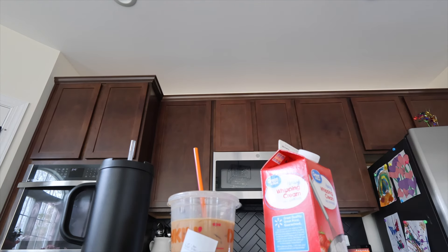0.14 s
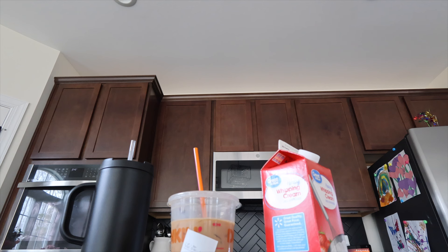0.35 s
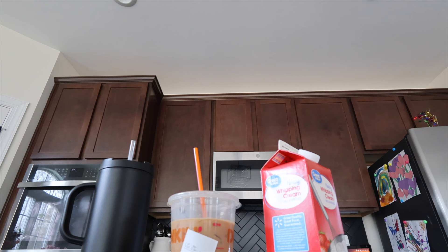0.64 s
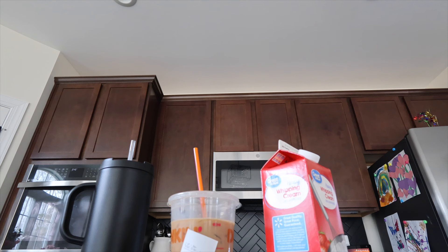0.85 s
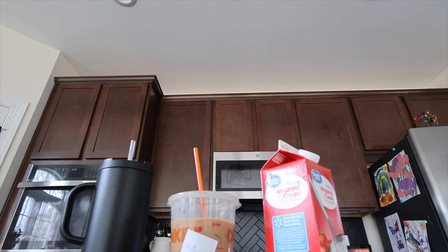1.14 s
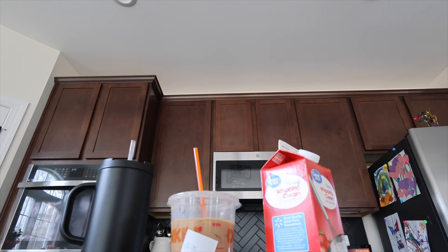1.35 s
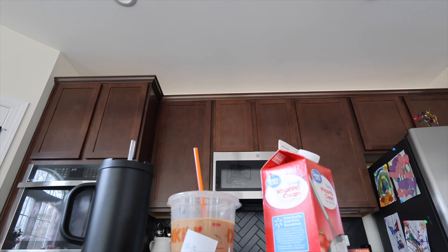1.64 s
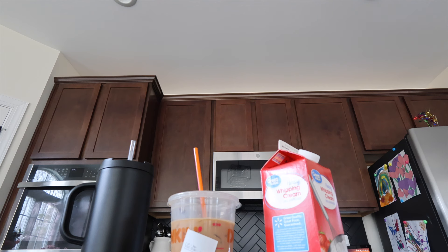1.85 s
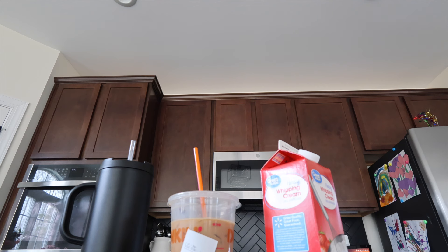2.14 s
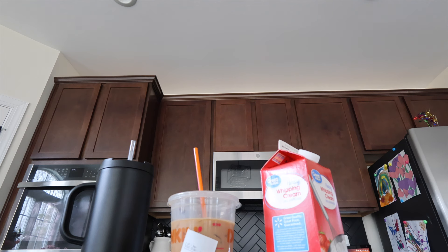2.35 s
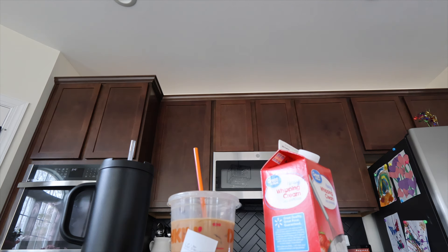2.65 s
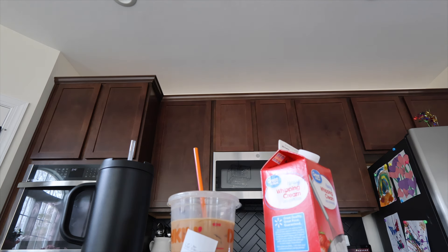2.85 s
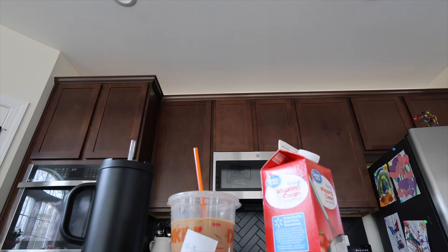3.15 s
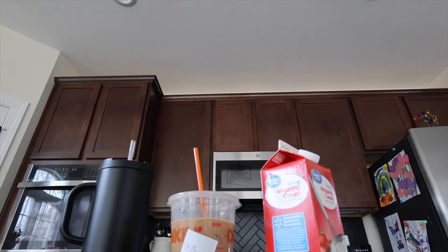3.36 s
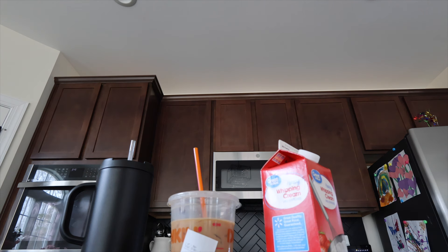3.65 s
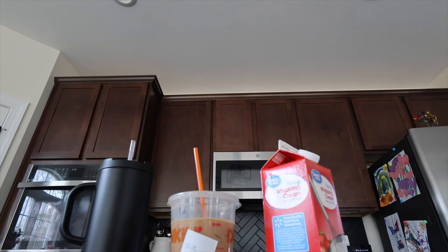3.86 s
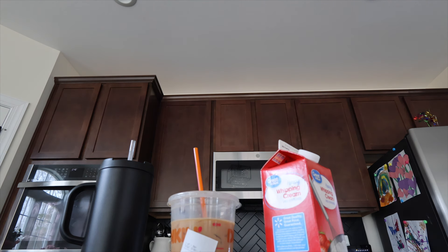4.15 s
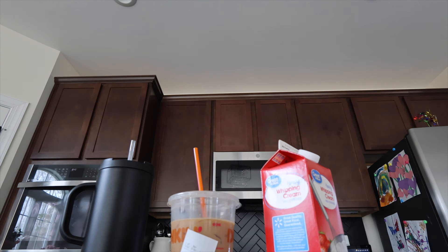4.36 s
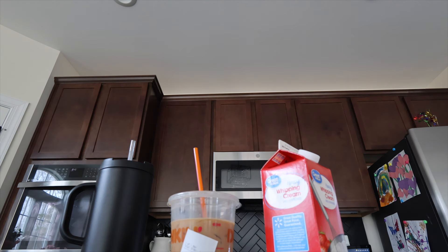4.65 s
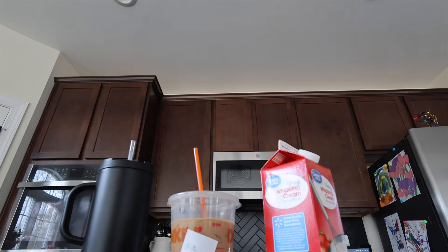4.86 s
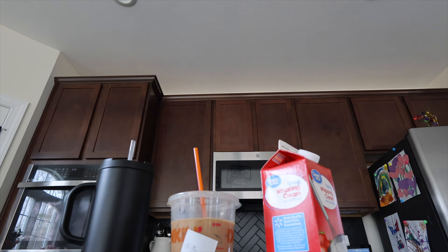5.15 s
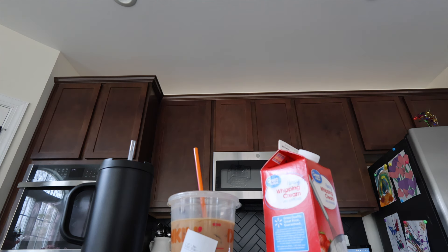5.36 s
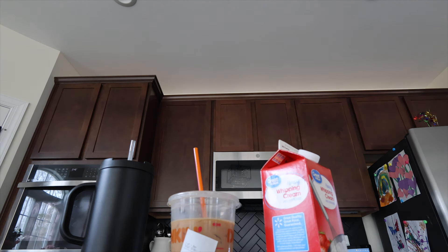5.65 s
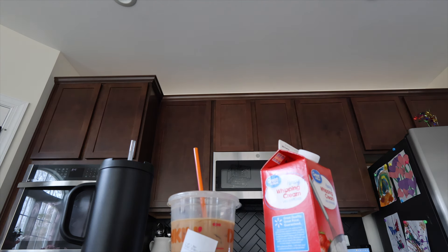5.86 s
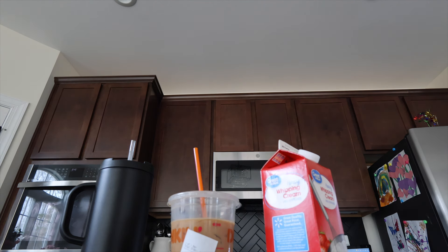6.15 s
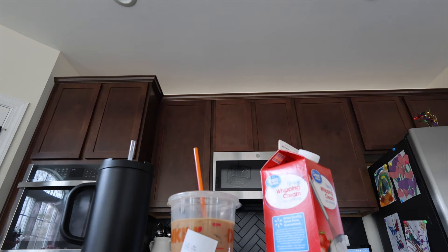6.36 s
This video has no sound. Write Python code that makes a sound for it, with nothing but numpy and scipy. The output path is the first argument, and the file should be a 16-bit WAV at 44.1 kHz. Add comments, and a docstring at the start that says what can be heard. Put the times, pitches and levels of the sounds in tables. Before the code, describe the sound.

Quiet kitchen with a humming, gurgling appliance and soft footsteps; one sudden loud wooden cupboard slam rings briefly, then small clicks and scuffs.

```python
"""First heard is an appliance humming and throbbing in a hard-walled kitchen, while slippers scuff and slide.
Across the kitchen a wooden cupboard door touches its frame, then bangs shut; panel modes and the room ring on.
Steps are noise in the bands of the sole, clicks are pairs of short rings, and the appliance is noise in the
resonances of its casing. Two close microphones: bass alike on both sides, treble largely unrelated."""
import sys
import numpy as np
from scipy import signal
from scipy.fft import rfft, irfft, next_fast_len
from scipy.io import wavfile
from scipy.ndimage import map_coordinates

SR = 44100
rng = np.random.default_rng(int(sys.argv[2]) if len(sys.argv) > 2 else 0)


def store_wav(level_fs):
    """Save 16-bit WAV to argv[1]."""
    pcm = np.round(np.clip(np.atleast_2d(level_fs), -1, 1) * 32767)
    wavfile.write(sys.argv[1], SR, pcm.T.astype(np.int16))


def magnitude_from_level(level_db):
    """Linear magnitude for a level in decibels (20 dB per decade)."""
    exponent = np.asarray(level_db, float) / 20
    return 10 ** exponent


N = 286763  # length in samples
HZ, FRAMES = signal.stft(np.zeros(N), SR, nperseg=128)[:2]  # band centres (Hz) and frame times (s)

# Door contacts: start_s, relative room_db, relative panel_ring_db, rattle_s (decay time),
# brightness_db_per_octave (reached well above 1 kHz)
DOOR_CONTACTS = [(2.403, -30, -42.5, 0.016, -4), (2.459, -26, -10.5, 0.005, 2.95),
                 (2.464, -13, -11, 0.0026, 0.67), (2.471, -10.5, -6, 0.0031, -1),
                 (2.476, -15, -16.5, 0.0048, -1.14), (2.488, -21, -13, 0.0048, -6)]
# Modes of door and carcass: pitch_hz, relative level_db, t60_s (capped in door())
PANEL_MODES = [(125, -13.5, 0.6), (154.5, -23, .45), (190.1, -14, 0.53), (239.2, -17.5, .5),
               (269, -4.5, .45), (292, -9.5, 0.71), (343, -10, 0.28), (388.8, -0.5, 0.36),
               (411.5, -4.5, 0.24), (444, -6, .3), (460.5, -0.5, .42), (470, -7.5, 0.2), (486, -8, 0.61),
               (609, -15, 0.55), (677, -9, 0.42), (734, -6.5, .45), (809.7, -15.5, .45), (945, -11.5, 0.52),
               (1120, -11, 0.65), (1275, -10, .5), (1614, -11.5, 0.4), (1848, -7.5, 0.34), (1944, -8.5, .4),
               (2180, -10.5, 0.31), (2490, -16.5, 0.4), (3120, -11.5, 0.22), (3260, -14, 0.51),
               (3570, -14.5, .35)]
# Colour of the bang in the room: frequency_hz, relative level_db (per Hz)
BANG_COLOUR = [(40, -59.5), (70, -39.5), (120, -16.5), (250, -16.5), (450, -9.5), (620, -11.5), (900, -11),
               (1400, -15), (2000, -13), (3100, -12.5), (4500, -14.5), (7000, -25), (10000, -33),
               (13000, -41.5), (15500, -45.5)]
# Likeness of the bang at the two microphones: frequency_hz, likeness (-1 to 1, no unit)
BANG_LIKENESS = [(60, 1), (300, 1), (640, 0.9), (1400, 0.93), (2400, 0.76), (3300, 0.5), (3900, -0.46),
                 (5200, -0.49), (6500, 0.046), (8000, -0.054), (10000, 0.36), (15000, 0.37)]
# Lean of the bang to one side: frequency_hz, left_minus_right_db
BANG_BALANCE = [(200, -0.95), (550, 0.2), (1650, 0.4), (3000, -0.5), (5000, 2), (8000, 0), (14000, -1)]
# Soles on the floor: start_s, relative hiss_db, grit_db and scrape_db (both relative to hiss), rise_s
SCUFF_EVENTS = [(0.06, -71.5, 14, 14, 0.003), (.268, -70, -5, 10, 0.039), (.61, -60, 6, 9, 0.025),
                (.645, -42.5, -6, -3.5, 0.0019), (.786, -67.5, 12.5, 6, 0.1), (.923, -58.5, 7, 3, 0.029),
                (1.182, -57, -0.5, -2, 0.01), (1.466, -78.5, 15.5, 19, 0.02),
                (1.914, -63.5, -7, -14, 0.0055), (2.275, -66.5, 4.5, 8, 0.0038), (3.651, -55, -2, -2, .022),
                (3.82, -63, -5, -12, 0.0048), (4.022, -45, -3.5, -18, 0.028), (4.036, -53, 3, 3, 0.0025),
                (4.165, -62, 4, -16, .028), (4.305, -68, 15.5, 17, .005), (4.39, -56, 1.5, -26, 0.036),
                (4.87, -67.5, 6.5, 0, 0.026), (4.909, -42.5, -2, -2.5, 0.0025),
                (5.684, -72.5, 4.5, 20.5, 0.0024), (5.732, -71.5, 15, -5, 0.0034),
                (6.426, -55, -3, -8, .008)]
# Heels landing: start_s, level_db
HEEL_SLAPS = [(.648, -46), (4.043, -44)]
# Sole bands, rows hiss, grit, scrape: centre_hz, width_hz (of the resonance before its power is narrowed)
SOLE_BANDS = [(8740, 4800), (3420, 3280), (1700, 2400)]
# Likeness of steps and clicks at the two microphones: frequency_hz, likeness (-1 to 1, no unit)
STEP_LIKENESS = [(400, 0.85), (1000, 0.73), (2400, 0.76), (3800, 0.326), (5500, -0.19), (7500, -.25),
                 (10000, -0.11), (15000, -0.066)]
# Small hard clicks: start_s, relative level_db, pitch_hz, second_pitch_hz, second_db (relative to the first)
CLICK_EVENTS = [(1.354, -55.5, 2610, 3220, -4), (2.967, -53, 1670, 1106, 0.5),
                (2.976, -51.5, 1570, 2730, 2), (2.979, -63.5, 7370, 5500, -14),
                (2.989, -58.5, 1370, 2930, 4), (3.096, -53.5, 3420, 4180, -4),
                (3.108, -64, 3520, 4040, -2.5), (3.14, -67, 3300, 4270, -5), (3.285, -59, 2520, 3320, 0.5),
                (3.52, -55, 2330, 2920, -0.5), (3.819, -57.5, 2340, 3330, -14),
                (3.869, -56.5, 2580, 2980, -6), (5.686, -55, 1070, 1700, -14.5)]
# Weight shifting on the floor: start_s, level_db, rise_s, fade_s (decay time)
FLOOR_THUDS = [(4.1, -51.5, 0.3, .05), (4.9, -56.5, 0.088, 0.036), (5.18, -58.5, .03, .05)]
# Casing resonances, each used squared: centre_hz, width_hz (before squaring), relative level_db
DRONE_MODES = [(178, 34, -10.5), (215.8, 13.7, -5), (291.7, 16.8, 1), (330.4, 23, -5), (364.3, 6.55, -5.5),
               (431.7, 16.8, -14)]
THROB_MODES = [(677, 82, -6.5), (737, 33, -9), (790, 45, -3)]
HISS_MODES = [(2290, 74, -1.5), (3294, 530, 0.5), (3700, 300, 1), (4507, 200, -6)]
# Surges of water in the appliance: start_s, length_s, level_db (at the start)
WATER_SURGES = [(0.181, 0.39, -55.5), (0.637, 0.19, -58), (1.005, 0.13, -56.5), (1.257, 0.58, -55.5),
                (1.928, 0.1, -65), (2.053, 0.075, -61), (2.187, 0.27, -61.5), (2.804, 0.39, -58.5),
                (3.324, 0.33, -60.5), (3.71, 0.064, -59.5), (3.873, 0.066, -61.5), (3.997, 0.52, -56.5),
                (4.62, 0.076, -61), (4.756, 0.085, -62), (4.903, .07, -65), (4.997, 0.059, -63),
                (5.155, 0.57, -57.5), (5.775, 0.11, -67), (5.984, 0.27, -61), (6.34, 0.047, -64.5),
                (6.443, .04, -65.5)]
# Swells of appliance hiss: start_s, level_db, rise_s, fade_s (decay time)
HISS_RISES = [(1.33, -66.5, .07, .6), (3.1, -67, 0.63, 0.51)]
# Colour of the steady room air: frequency_hz, relative level_db (per Hz)
AIR_COLOUR = [(30, -45.5), (50, -23), (60, 5.5), (73, -7.5), (86, 1.5), (105, -8.5), (140, -4.5), (300, -2),
              (520, -9), (700, -12.5), (850, -18), (1000, -18.5), (2000, -23.5), (4500, -30.5),
              (7600, -31.5), (11000, -36), (15500, -42.5)]
# Likeness of appliance and air at the two microphones: frequency_hz, likeness (-1 to 1, no unit)
AIR_LIKENESS = [(60, 1), (300, 1), (640, 0.96), (1400, .7), (3000, 0.55), (4600, -0.13), (6800, -0.01),
                (10000, -0.16), (15000, -0.22)]
# Decay of the kitchen: frequency_hz, t60_s
KITCHEN_DECAY = [(100, 0.44), (300, 0.66), (1000, 0.53), (3000, 0.5), (7000, 0.45), (12000, .26)]


def door():
    """Each contact rattles briefly, fills the room and sets the panel modes ringing as decaying sines."""
    longest_t60_s, ring_rise_s = 0.46, 0.0077
    rings, power = np.zeros((2, N)), 0
    t = np.arange(30000) / SR

    def shift(hz):
        """Phase in radians by which a mode is out of step at the left and right microphones."""
        return np.arccos(np.clip(along(BANG_LIKENESS, hz), -1, 1)) * np.array([[-0.3], [0.3]])

    for s, room_db, ring_db, rattle_s, bright_db in DOOR_CONTACTS:
        colour = magnitude_from_level(room_db + bright_db * np.log2(HZ / 1000 + 1)) ** 2
        rise_s = 0.002 + 0.3 * rattle_s  # a longer rattle builds up more slowly
        power = power + np.outer(colour, stroke(s, rise_s, rattle_s))
        ring = 0
        for hz, level_db, t60_s in PANEL_MODES:
            decay = magnitude_from_level(level_db - 60 * t / min(t60_s, longest_t60_s))
            ring = ring + decay * np.sin(2 * np.pi * hz * t + shift(hz))
        add(rings, s, magnitude_from_level(ring_db - 10.5) * ring * (1 - np.exp(-t / ring_rise_s)))
    wash = room(power, BANG_LIKENESS, direct_db=-0.5)
    wash = filtered(wash, lambda hz: magnitude_from_level(along(BANG_COLOUR, hz) + 25.0))
    sides = np.array([[0.5], [-0.5]])
    return filtered(wash + rings, lambda hz: magnitude_from_level(along(BANG_BALANCE, hz) * sides))


def thump():
    """Air squeezed out of the cupboard as the door closes: one soft low push, a decaying sine."""
    start_s, level_db, pitch_hz, rise_s, t60_s = 2.468, -21.5, 108.6, 0.015, 0.13
    t = np.maximum(np.arange(N) / SR - start_s, 0)
    envelope = magnitude_from_level(level_db - 60 * t / t60_s) * (1 - np.exp(-t / rise_s))
    return envelope * np.sin(2 * np.pi * pitch_hz * t)


def scuffs():
    """Friction noise through three broad bands of the sole, heard mostly through the room."""
    bands = []
    for centre_hz, width_hz in SOLE_BANDS:
        treble_cut = 1 + (HZ / 12500) ** 8
        bass_cut = 1 + (1100 / (HZ + 1)) ** 4
        bands.append(abs(peak(HZ, centre_hz, width_hz)) ** 3 / treble_cut / bass_cut)
    hiss, grit, scrape = bands
    power = 0
    for s, hiss_db, grit_db, scrape_db, rise_s in SCUFF_EVENTS:
        colour = hiss + magnitude_from_level(grit_db) ** 2 * grit + magnitude_from_level(scrape_db) ** 2 * scrape
        slacken_s = 0.014 + 0.5 * rise_s  # a slower slide also dies away more slowly
        power = power + np.outer(magnitude_from_level(hiss_db) ** 2 * colour, stroke(s, rise_s, slacken_s))
    grains = magnitude_from_level(4 * rng.standard_normal(len(FRAMES)))  # the sole catches unevenly
    return magnitude_from_level(9.0) * room(power * grains, STEP_LIKENESS, direct_db=-3.5)


def slaps():
    """A heel lands: a short dry crack of broad-band noise, heard directly."""
    centre_hz, width_hz, t60_s, rise_s = 3000, 5000, 0.03, 0.001
    t = np.arange(N) / SR
    gain = 0
    for s, level_db in HEEL_SLAPS:
        decay = magnitude_from_level(level_db - 60 * np.abs(t - s) / t60_s)
        gain = gain + decay * np.clip((t - s) / rise_s, 0, 1)
    crack = filtered(rng.standard_normal((2, N)), lambda hz: peak(hz, centre_hz, width_hz))
    return gain * unit(stereo(crack, STEP_LIKENESS))


def clicks():
    """Two short rings a click, then the room's answer in the same colour."""
    width_hz, direct_gain_db, room_gain_db = 270, 4, 19.0
    out, power = np.zeros((2, N)), 0
    t = np.arange(1500) / SR
    envelope = np.exp(-0.9 * width_hz * t) * (1 - np.exp(-t / 0.001))
    for s, level_db, hz, second_hz, second_db in CLICK_EVENTS:
        ring = np.sin(2 * np.pi * hz * t) + magnitude_from_level(second_db) * np.sin(2 * np.pi * second_hz * t)
        add(out, s, magnitude_from_level(level_db + direct_gain_db) * (ring * envelope)[None])
        first = abs(peak(HZ, hz, width_hz)) ** 2
        second = abs(magnitude_from_level(second_db) * peak(HZ, second_hz, width_hz)) ** 2
        colour = (first + second) ** 1.4
        power = power + np.outer(magnitude_from_level(level_db) ** 2 * colour, stroke(s, 0.001765, 0.0091))
    return out + magnitude_from_level(room_gain_db) * room(power, STEP_LIKENESS, direct_db=-1)


def thuds():
    """The floor rumbles under shifting weight: resonant low noise, alike at both microphones."""
    rumble = filtered(rng.standard_normal(N), lambda hz: peak(hz, 80, 122))
    return np.sqrt(strokes(FLOOR_THUDS)) * unit(rumble)


def appliance():
    """Motor and water noise in the casing's resonances: a wavering, sinking drone, hiss and a surging throb."""
    drone_db, drone_sag_db_per_s, drone_waver_db = -54, 0.38, 1.5
    hiss_db, throb_waver_db = -70, 1.5
    t = np.arange(N) / SR
    drone_gain = magnitude_from_level(drone_db - drone_sag_db_per_s * t + drone_waver_db * waver(t))
    drone = drone_gain * noise(casing(DRONE_MODES))
    hiss = np.sqrt(magnitude_from_level(hiss_db) ** 2 + strokes(HISS_RISES)) * noise(casing(HISS_MODES))
    throb = 0
    for centre_hz, width_hz, level_db in THROB_MODES:
        # each resonance of the middle band wavers by itself
        gain = magnitude_from_level(throb_waver_db * waver(t) + level_db) * np.sqrt(width_hz)
        throb = throb + gain * noise(casing([(centre_hz, width_hz, level_db)]))
    return drone + hiss + surges(t) * unit(throb)


def casing(modes):
    """Response of the casing: the powers of its squared resonances add up."""
    return lambda hz: np.sqrt(sum(abs(magnitude_from_level(db) * peak(hz, c, w) ** 2) ** 2 for c, w, db in modes))


def waver(t):
    """Smooth random wandering through 4.5 random values a second."""
    return map_coordinates(rng.standard_normal(100), [t * 4.5])


def surges(t):
    """Gain of the water: each surge sets in quickly, sags for up to a second and drains away."""
    rise_s, fall_s, sag_db_per_s = 0.015, 0.062, 8.5
    gain = 0
    for s, length_s, level_db in WATER_SURGES:
        onset = np.clip((t - s) / rise_s, 0, 1)
        release = np.clip(1 - (t - s - length_s) / fall_s, 0, 1)
        gain = gain + onset * release * magnitude_from_level(level_db - sag_db_per_s * np.clip(t - s, 0, 1))
    return gain


def air():
    """Steady room tone of coloured noise, with a thin fuzzy line high up."""
    line = magnitude_from_level(-85.0) * noise(lambda hz: peak(hz, 7600, 60))
    return magnitude_from_level(-56) * noise(lambda hz: magnitude_from_level(along(AIR_COLOUR, hz))) + line


def room(power, alike, direct_db):
    """Source power (band x time) is heard directly and fills a store of room energy draining band by band."""
    keep = magnitude_from_level(-60 * FRAMES[1] / along(KITCHEN_DECAY, HZ)) ** 2  # energy left after one frame
    stored = np.array([signal.lfilter([1 - k], [1, -k], band) for k, band in zip(keep, power)])
    grain = signal.stft(rng.standard_normal((2, N)), nperseg=128)[2]
    z = grain * np.sqrt(stored + magnitude_from_level(direct_db) ** 2 * power)
    return stereo(signal.istft(z, nperseg=128)[1][:, :N], alike)


def stroke(s, rise_s, hold_s):
    """Power of one contact over time: it swells, then slackens."""
    t = FRAMES - s
    swell = np.clip(t / abs(rise_s), 0, 1) ** 2
    return swell * np.exp(-2 * np.maximum(t - abs(rise_s), 0) / abs(hold_s))


def strokes(rows):
    """Summed power of (start_s, level_db, rise_s, fade_s) rows, one value per sample."""
    power = sum(magnitude_from_level(db) ** 2 * stroke(s, rise_s, fade_s) for s, db, rise_s, fade_s in rows)
    return np.interp(np.arange(N) / SR, FRAMES, power)


def noise(response):
    """Stereo noise of rms 1 with a given colour."""
    return unit(stereo(filtered(rng.standard_normal((2, N)), response), AIR_LIKENESS))


def stereo(pair, alike):
    """Two unrelated signals mixed to a left-right likeness."""
    def mix(hz):
        turn = np.arccos(np.clip(along(alike, hz), -1, 1)) / 2
        return np.array([np.cos(turn), np.sin(turn)])

    mid, side = filtered(pair, mix)
    return np.array([mid + side, mid - side])


def peak(hz, centre_hz, width_hz):
    """One causal resonance."""
    return 1j * hz * width_hz / (centre_hz ** 2 - hz ** 2 + 1j * hz * width_hz)


def filtered(x, response):
    """x times a response of frequency."""
    m = next_fast_len(x.shape[-1] + 4096)
    return irfft(rfft(x, m) * response(np.fft.rfftfreq(m, 1 / SR)), m)[..., :x.shape[-1]]


def along(points, hz):
    """(frequency_hz, value) points read on a log axis."""
    f, v = np.transpose(points)
    return np.interp(np.log(hz + 1), np.log(f + 1), v)


def unit(x):
    """Scaled to rms 1."""
    return x / np.sqrt(np.mean(x ** 2) + 1e-20)


def add(out, s, x):
    """Mixes x into out from time s."""
    part = out[:, round(s * SR):][:, :x.shape[1]]
    part += x[:, :part.shape[1]]


def scene():
    """Everything in the kitchen."""
    return door() + thump() + scuffs() + slaps() + clicks() + thuds() + appliance() + air()


def roll_off(x):
    """The treble ends steeply here."""
    return signal.sosfilt(signal.butter(12, 15560, fs=SR, output="sos"), x)


def record(dry):
    """The right microphone leads slightly in the bass; deep bass is cut; peaks stop at full scale."""
    lag_s = np.array([[2.5 / SR], [0]])  # left, right; the lag shrinks from the bass upwards

    def microphones(hz):
        bass_cut = (1j * hz / (45 + 1j * hz)) ** 3
        return bass_cut * np.exp(-2j * np.pi * hz / (1 + hz / 900) * lag_s)

    return roll_off(np.clip(filtered(dry, microphones), -1, 1))


dry = scene()
out = record(dry)
store_wav(out)
```